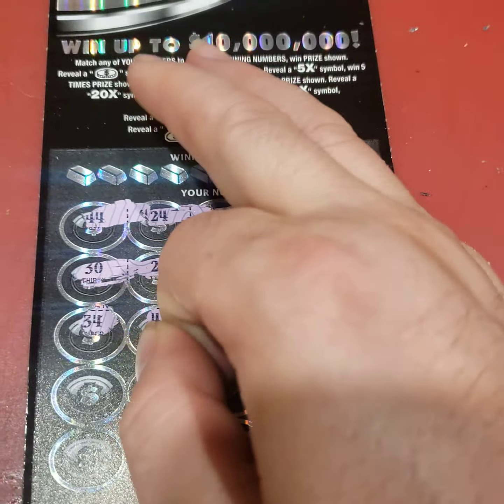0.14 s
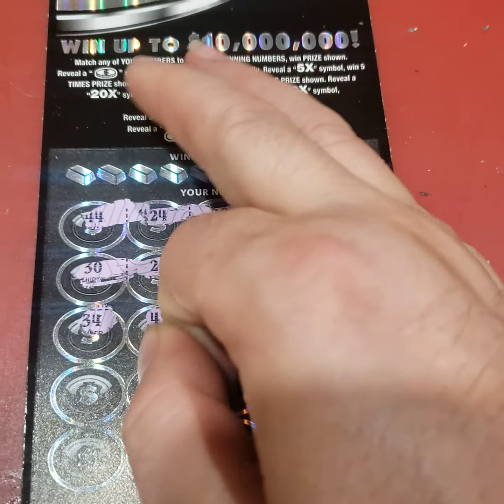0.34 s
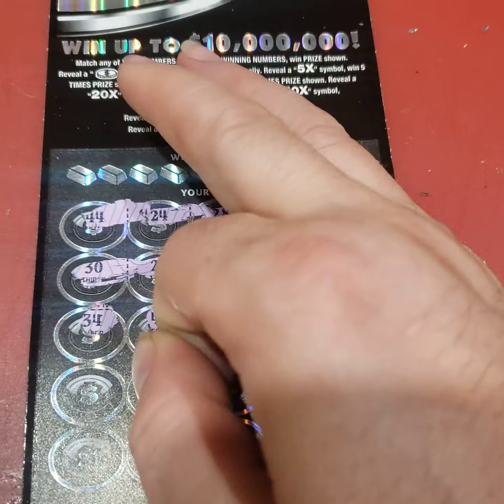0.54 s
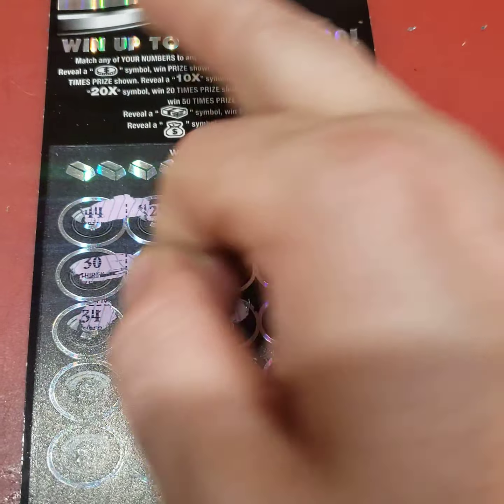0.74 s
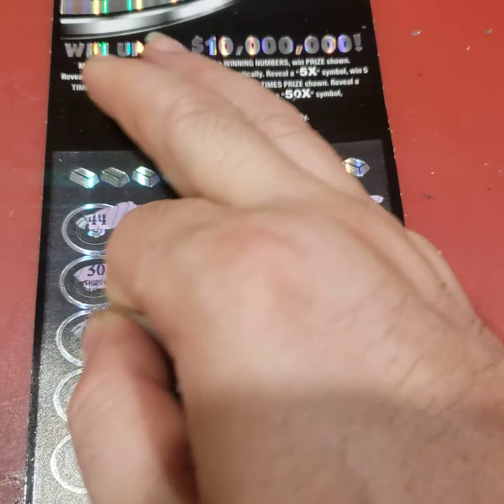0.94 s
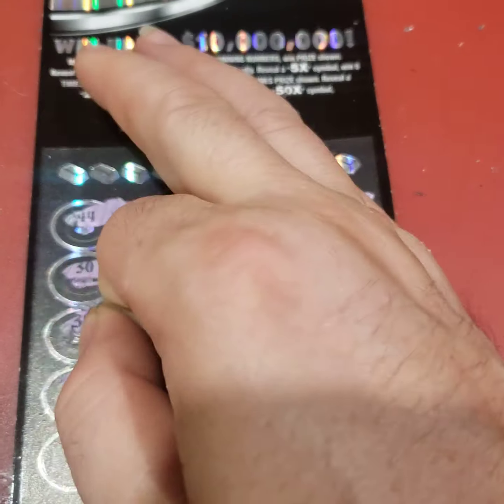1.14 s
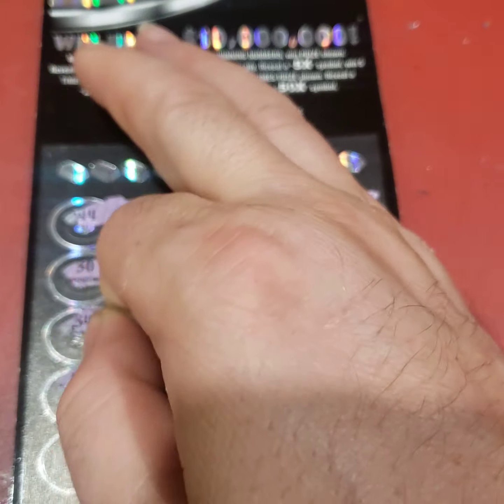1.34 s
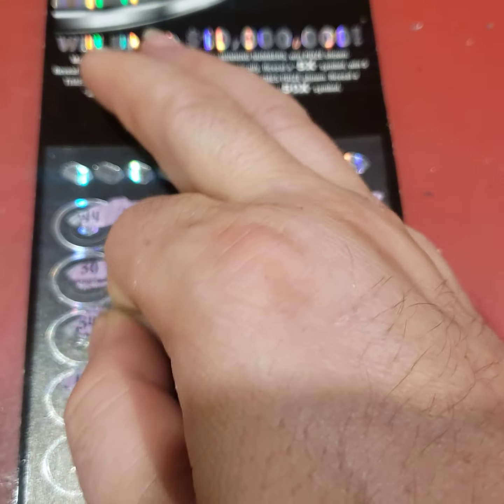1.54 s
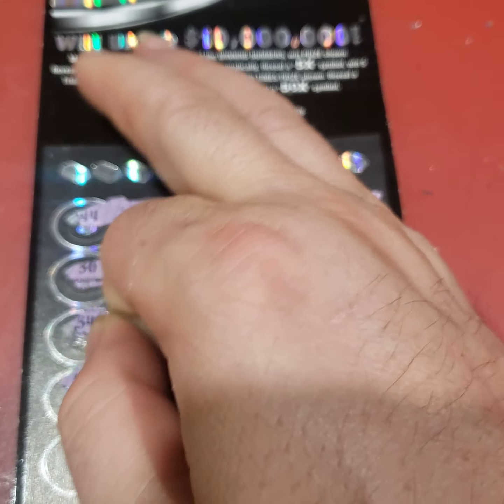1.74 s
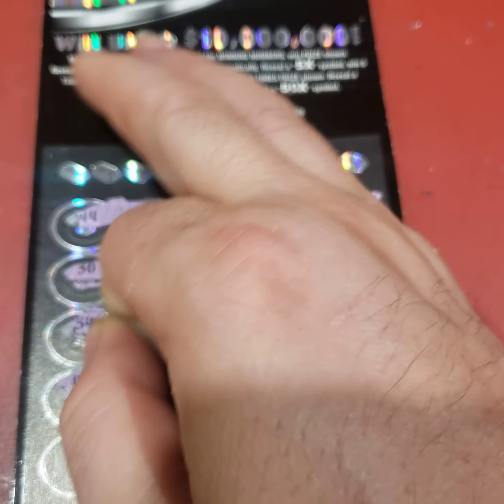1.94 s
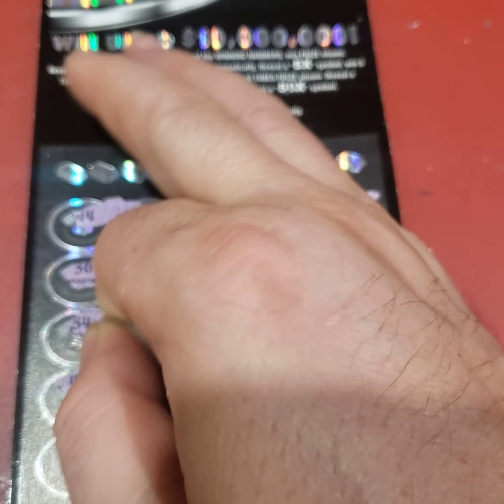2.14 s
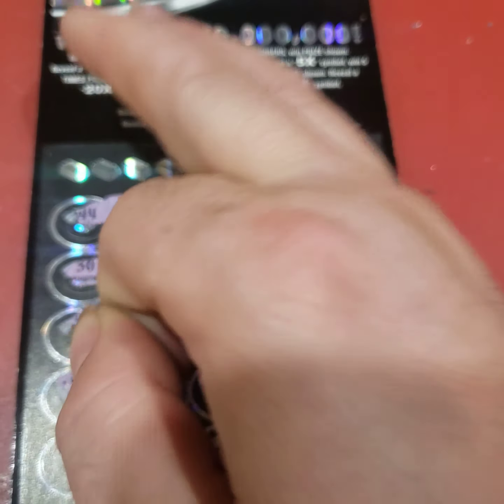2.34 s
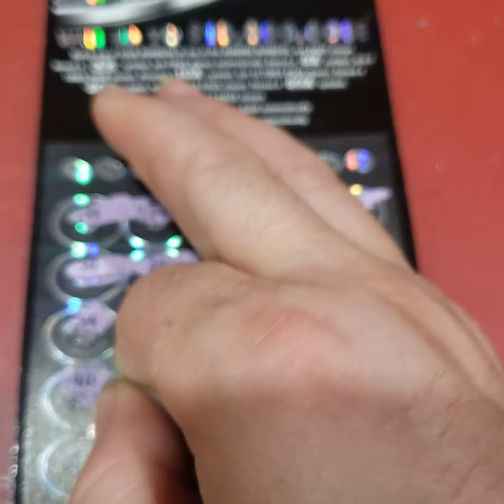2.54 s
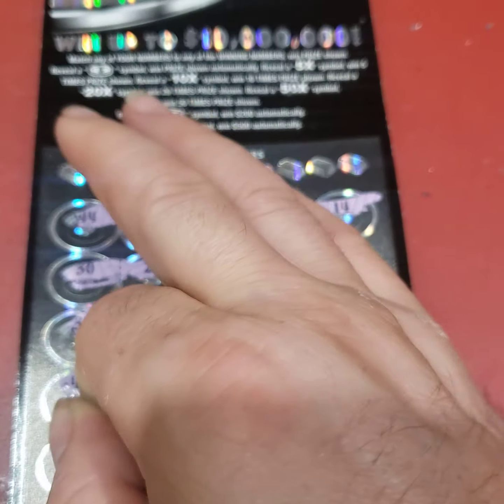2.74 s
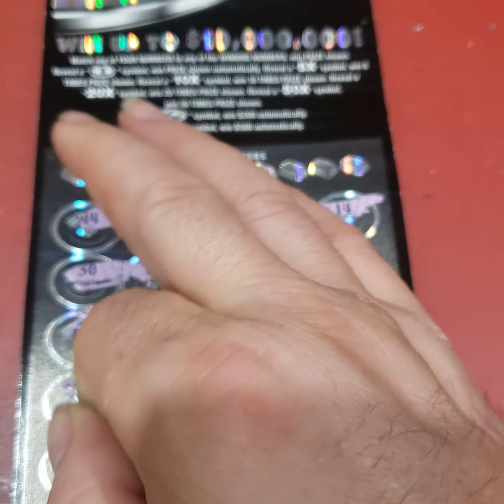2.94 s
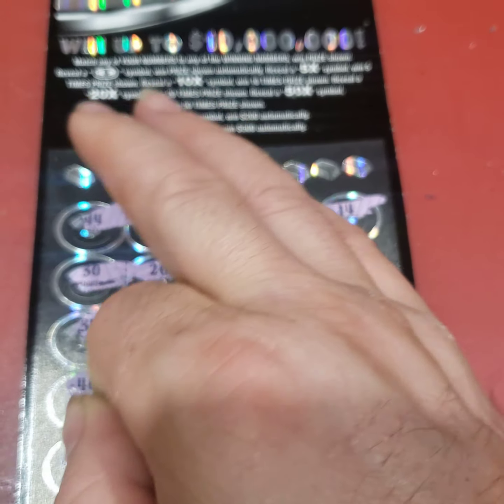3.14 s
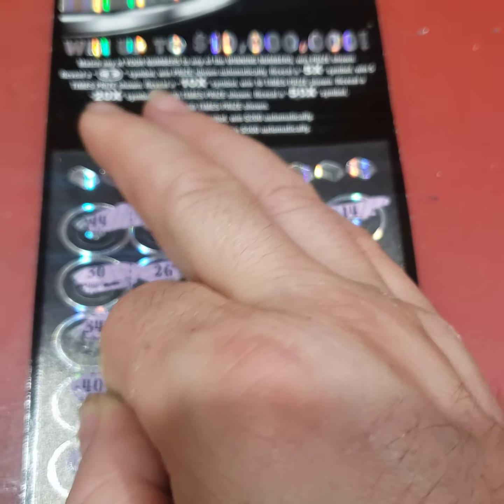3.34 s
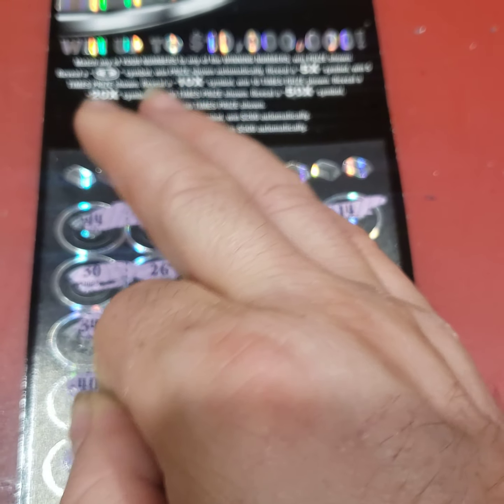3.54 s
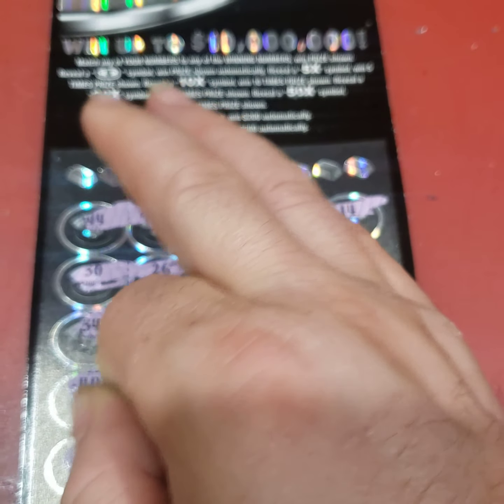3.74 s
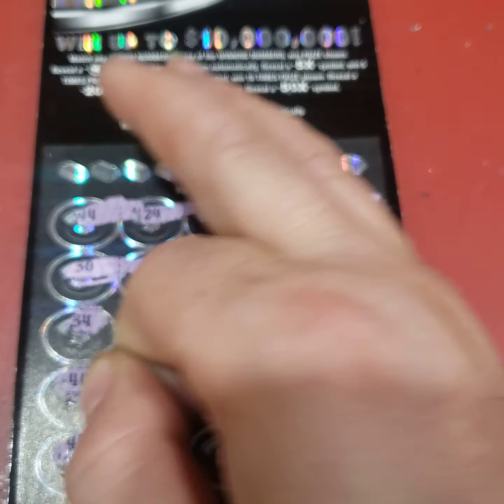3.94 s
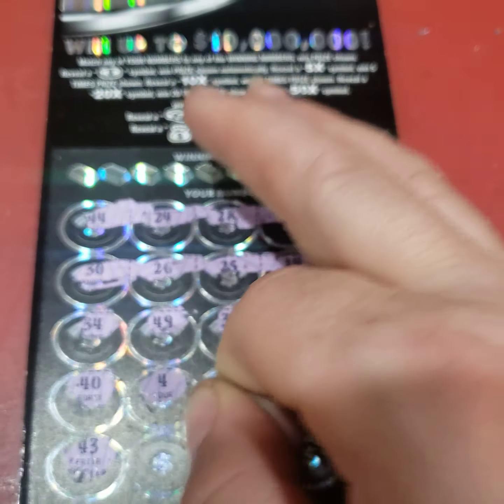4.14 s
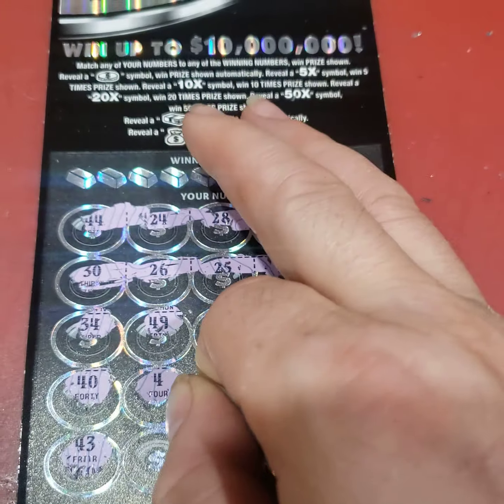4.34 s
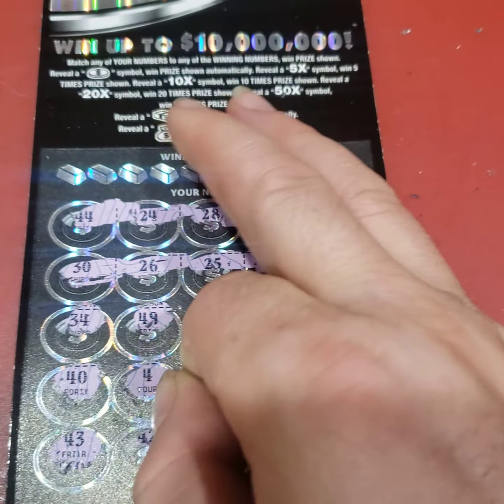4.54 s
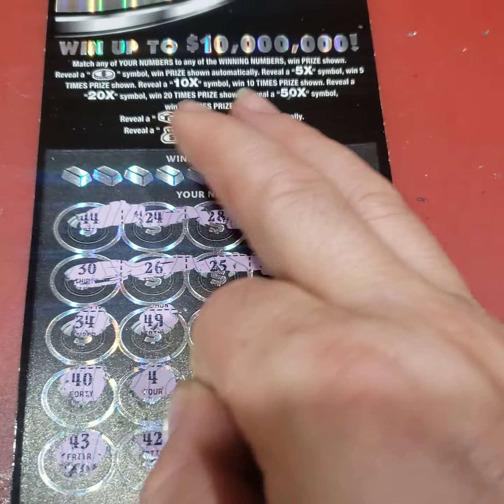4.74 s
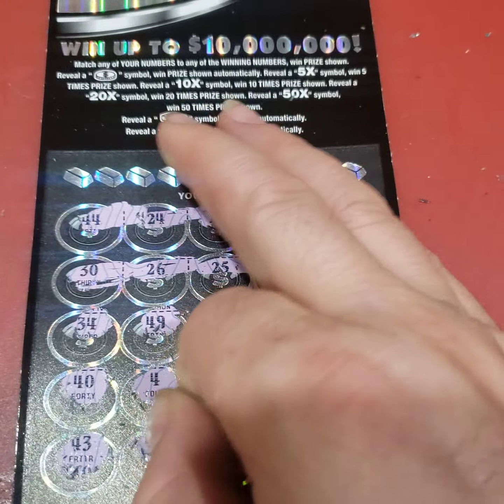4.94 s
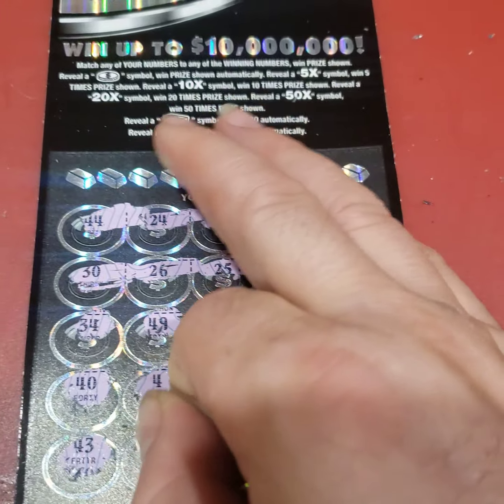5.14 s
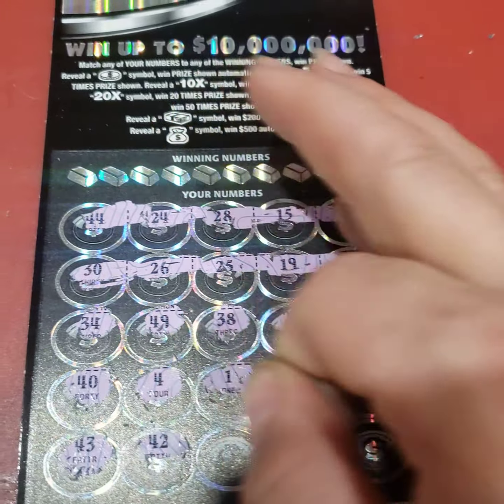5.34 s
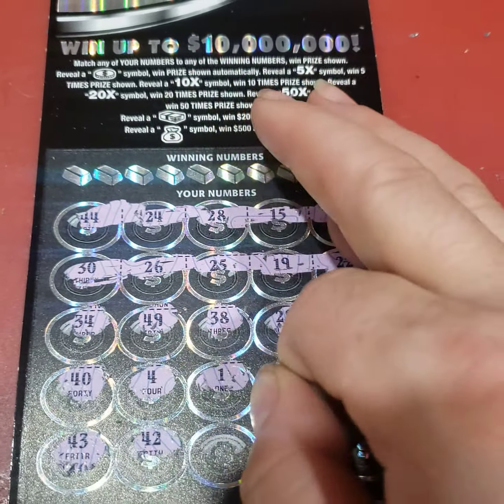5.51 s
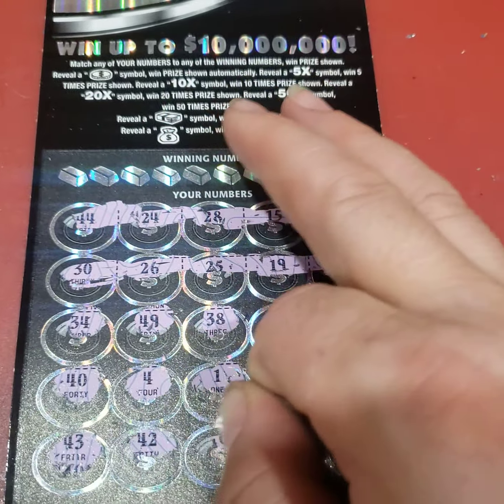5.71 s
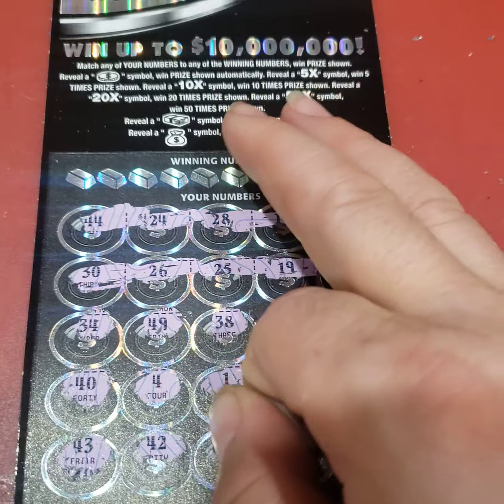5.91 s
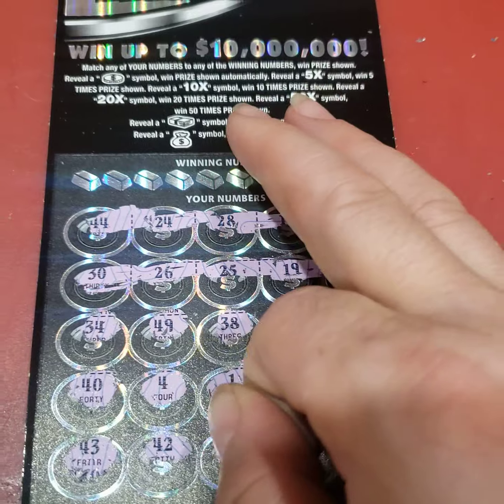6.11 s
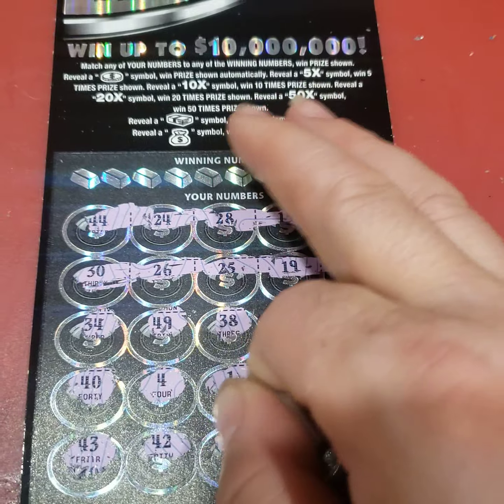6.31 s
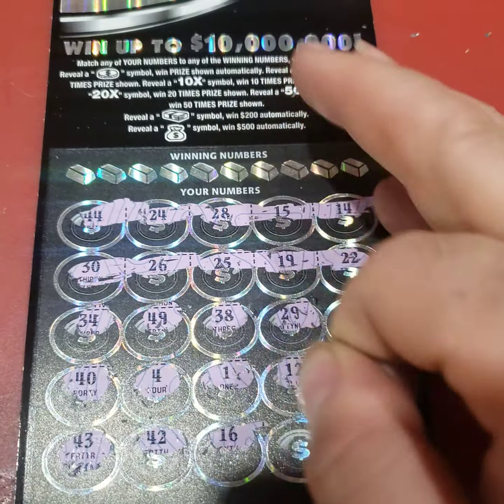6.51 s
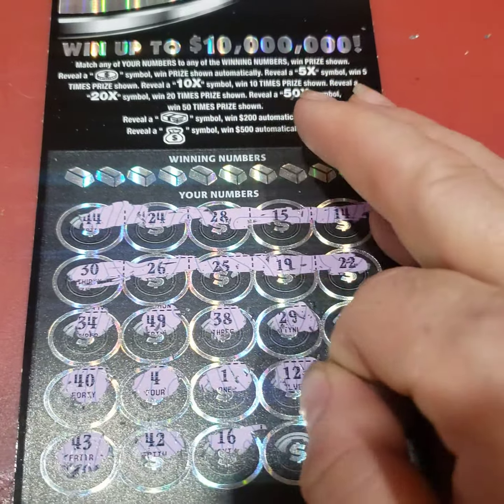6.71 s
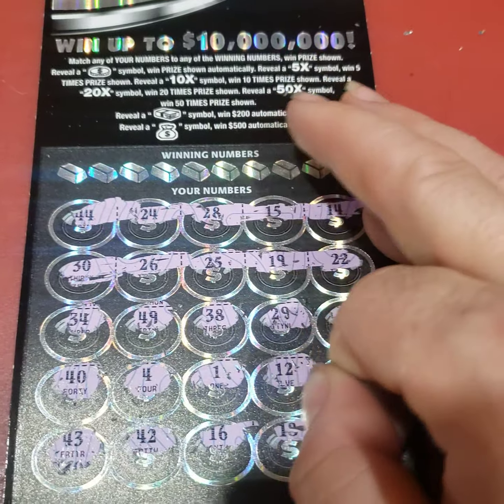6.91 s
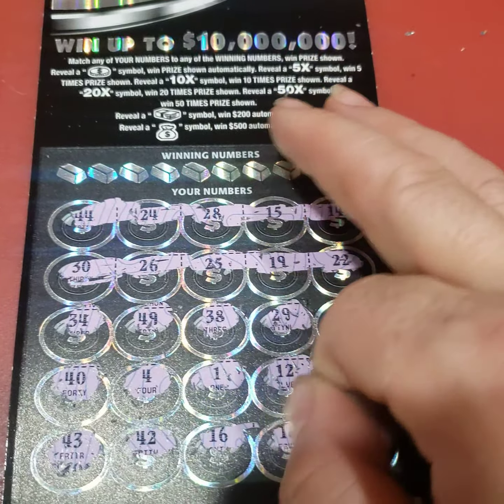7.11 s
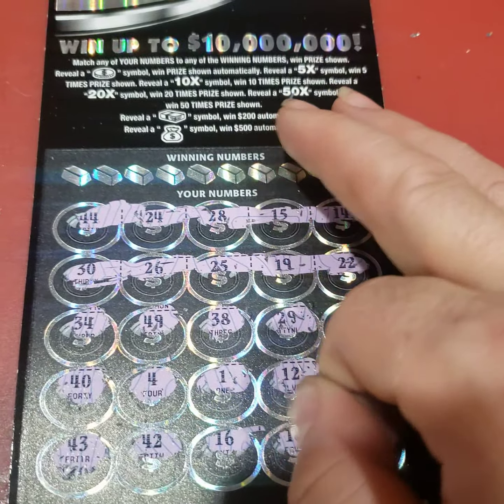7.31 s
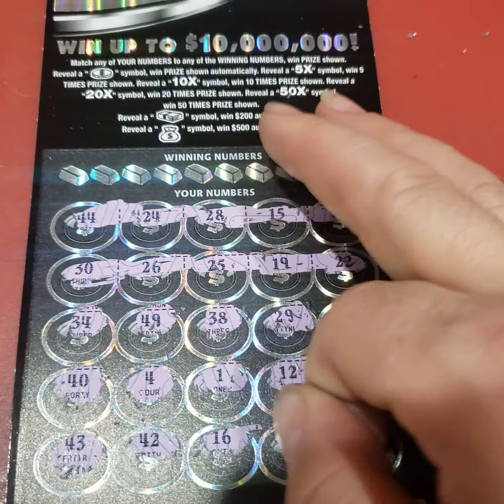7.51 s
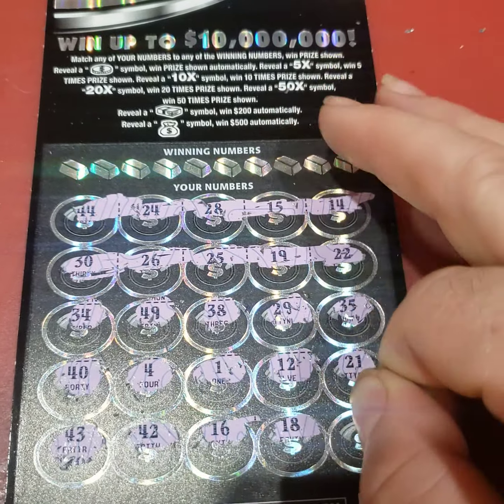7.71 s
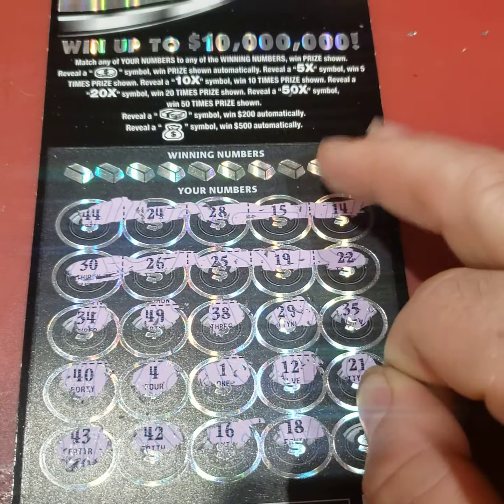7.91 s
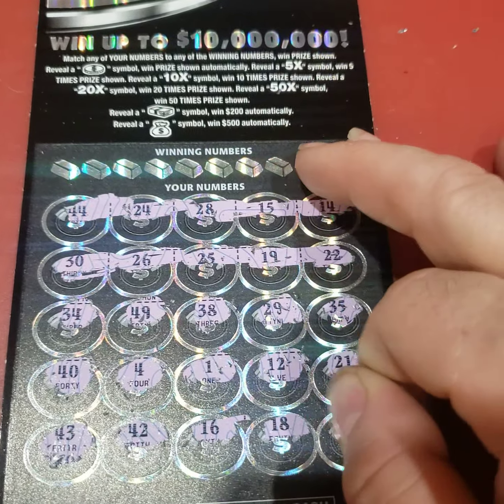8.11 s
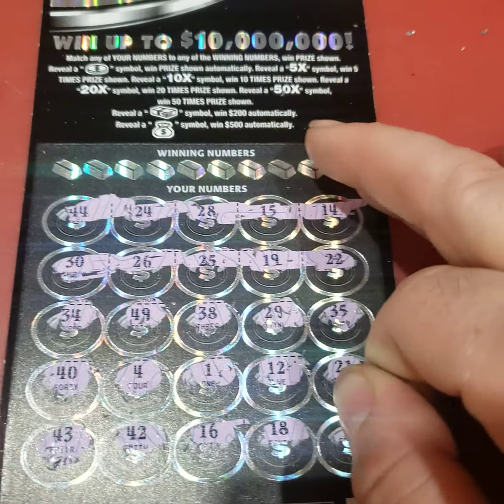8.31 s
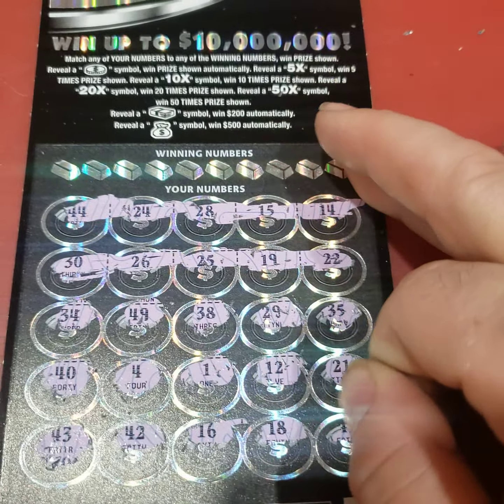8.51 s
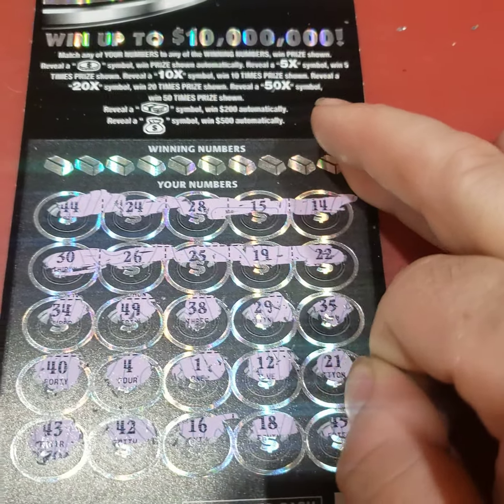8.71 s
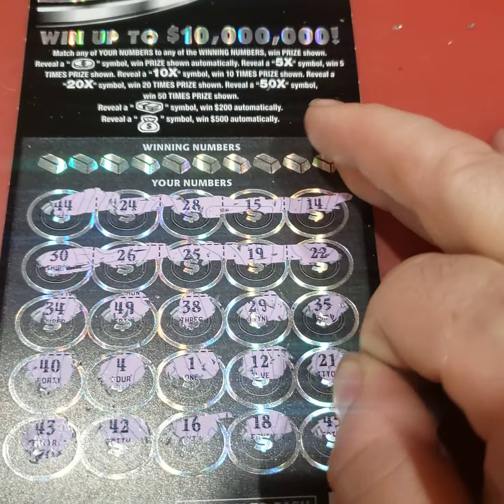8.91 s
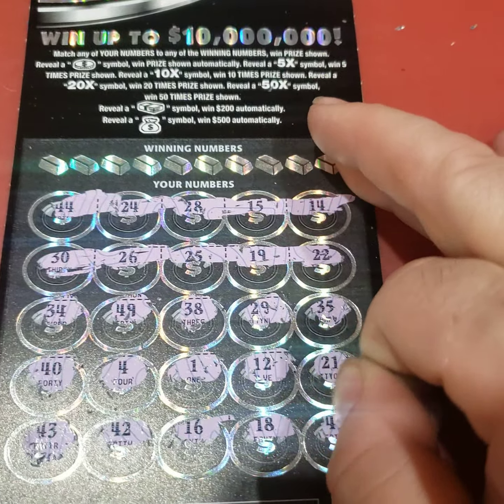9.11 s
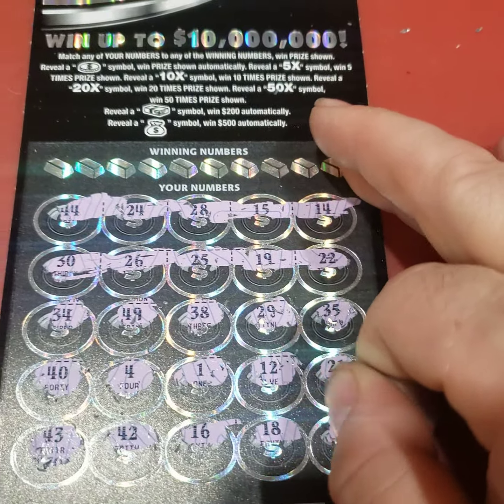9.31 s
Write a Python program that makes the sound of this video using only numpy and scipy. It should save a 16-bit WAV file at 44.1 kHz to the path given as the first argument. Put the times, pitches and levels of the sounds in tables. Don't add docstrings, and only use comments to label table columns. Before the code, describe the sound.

Close, dry, gritty scratching of a coin on a coated card comes in rapid bursts, with small knocks and quiet gaps between.

```python
import sys
import numpy as np
from scipy import signal
from scipy.fft import rfft, irfft
from scipy.io import wavfile
from scipy.ndimage import uniform_filter1d

SR = 44100
rng = np.random.default_rng(int(sys.argv[2]) if len(sys.argv) > 2 else 0)


def file_out(sig):
    cols = np.atleast_2d(sig).T
    lim = np.clip(cols, -1, 1)
    pcm = np.round(lim * 32767).astype(np.int16)
    wavfile.write(sys.argv[1], SR, pcm)


def nominal_scale(level):
    x = np.asarray(level, float) / 20
    return 10 ** x


N = 412758


def rms_one(x):
    return x / np.sqrt(np.mean(x ** 2) + 1e-20)


def at_hz(points, hz):
    points = np.array(points)
    return np.interp(np.log(np.maximum(hz, 1)), np.log(points[:, 0]), points[:, 1])


def drift(rate):
    r = np.exp(-32 * np.pi * rate / SR)
    noise = rng.standard_normal(N // 16 + 2002)
    slow = signal.lfilter([1], [1, -2 * r, r * r], noise)[2000:]
    return np.interp(np.arange(N) / 16, np.arange(len(slow)), rms_one(slow))


def grains(per_s, size_db):
    sizes = nominal_scale(size_db * np.minimum(rng.exponential(1, N), 4)) * rng.choice([-1, 1], N)
    return rms_one(sizes * (rng.random(N) < per_s / SR))


def band(x, low_hz, high_hz):
    return signal.sosfilt(signal.butter(2, [low_hz, high_hz], "band", fs=SR, output="sos"), x)


def bell(x, hz, width, gain_db):
    w, a = 2 * np.pi * hz / SR, nominal_scale(gain_db / 2)
    k = np.sin(w) * width / hz / 2
    return signal.lfilter([1 + k * a, -2 * np.cos(w), 1 - k * a], [1 + k / a, -2 * np.cos(w), 1 - k / a], x)


def body(force, modes, gains):
    out, power = np.zeros((2, N)), 0
    for k, (hz, width, left_db, right_db, lag) in enumerate(modes):
        r, w = np.exp(-np.pi * width / SR), 2 * np.pi * hz / SR
        drive = (-1) ** k * (1 - r) * gains[k] * force + 1e-18
        for side, (level_db, phase) in enumerate([(left_db, w), (right_db, w - lag)]):
            taps = [0, np.sin(phase), r * np.sin(w - phase)]
            out[side] += nominal_scale(level_db) * signal.lfilter(taps, [1, -2 * r * np.cos(w), r * r], drive)
        power += nominal_scale(2 * left_db) * (1 - r) / 4
    return out / np.sqrt(power)


def wander(modes, spread_db, rate):
    return [nominal_scale(spread_db * drift(rate)) for _ in modes]


# (start t/s, coating grit level/dB, coin ring level/dB, hollow under fingers level/dB, opening to port level/dB)
BOUTS = [(0, -12, -0.5, 2.5, 1.5), (.969, -15, 0.5, 4.5, 6.5), (1.849, -18, -1, 6, 9),
         (2.716, -11.5, -1.5, 1.5, 0), (3.9, -26, 0, -2, 5), (4.426, -9.5, -1.5, -8, -1),
         (5.623, -6, 2, 8, -4.5), (6.766, -11, 9, 8, -1), (7.7, -17, -5, 3, 5), (8.057, -18.5, 10.5, 9, 1),
         (8.807, -16.5, 9, 6, 0.5)]
GRIT, COIN_RING, HOLLOW, OPENING = 1, 2, 3, 4


def bout_at(s):
    bouts = np.array(BOUTS)
    number = np.maximum(np.searchsorted(bouts[:, 0] - .02, s) - 1, 0)
    rows = bouts[number]
    return rows.T, s - rows[:, 0]


SETTLE_S = 0.98


def shade(palm_db, axis=None, share=1, mean_db=0):
    bout, since = bout_at(np.arange(N) / SR)
    level_db = np.interp(since, [0, SETTLE_S], palm_db)
    if axis:
        level_db = level_db + share * (bout[axis] - mean_db)
    return nominal_scale(uniform_filter1d(level_db, size=2000))


# (start t/s, length t/s, table
# level/dB, skim level/dB, extra tearing level/dB)
STROKES = [(0.0, 0.015, -34.5, -6.5, 2), (0.017, 0.086, -38.5, 0.5, 0), (0.137, 0.06, -36, -3, -2.5),
           (0.25, 0.041, -41, -3.5, -3), (0.295, 0.028, -35.5, -5, 0.5), (0.355, 0.07, -35, -8, -0.5),
           (0.464, 0.053, -47, 4.5, -1.5), (0.542, 0.068, -35.5, -6.5, 0.5),
           (0.967, 0.11, -34, -6, -0.5), (1.124, 0.081, -39.5, 1, -0.5),
           (1.234, 0.071, -34.5, -5.5, 1), (1.322, 0.095, -39.5, -0.5, 3),
           (1.443, 0.069, -36.5, -7.5, -0.5), (1.535, 0.068, -40.5, 2.5, -2),
           (1.653, 0.08, -35.5, -5, -5), (1.846, 0.087, -37, -11, 0.5), (1.957, 0.033, -41, 0, -1),
           (2.078, 0.063, -36, -7.5, 3), (2.167, 0.051, -42.5, -2.5, 0), (2.253, 0.065, -38.5, -6, 0),
           (2.718, 0.077, -30, -11, 2), (2.832, 0.081, -34.5, -5, 0.5),
                  (2.939, 0.082, -37.5, -5, -0.5), (3.031, 0.11, -37, -3.5, 4.5),
                  (3.159, 0.08, -37, -9.5, 3), (3.259, 0.05, -38.5, -1.5, 2),
                  (3.308, 0.038, -36.5, -3.5, 1.5), (3.371, 0.092, -32.5, -7.5, 1.5),
                  (3.48, 0.061, -39.5, -2, 2.5), (3.577, 0.093, -36.5, -10, 0.5),
                  (3.683, 0.11, -44, -12, 1), (3.788, 0.08, -33, -12, -1.5),
                  (4.426, 0.077, -33.5, -7, -1.5), (4.537, 0.086, -36.5, -7, 1),
                  (4.66, 0.065, -32.5, -8.5, 0.5), (4.743, 0.087, -35.5, -3.5, 2.5),
                  (4.868, 0.09, -36, -11, 1.5), (4.982, 0.084, -42, -8, -1), (5.111, 0.11, -35.5, -12, 1.5),
           (5.626, 0.1, -30, -9, -1.5), (5.756, 0.081, -35.5, -6.5, 0),
                 (5.888, 0.074, -36, -5.5, -0.5), (5.987, 0.04, -37.5, -3.5, 0.5),
                 (6.025, 0.062, -37, -5.5, 0.5), (6.087, 0.11, -36.5, -7, -0.5),
                 (6.207, 0.092, -43.5, -4.5, 3.5), (6.323, 0.1, -34.5, -10.5, -2),
                 (6.764, 0.093, -28, -11.5, -1), (6.91, 0.078, -36, -2.5, 0),
                 (7.042, 0.043, -33.5, -2.5, -0.5), (7.093, 0.024, -32.5, -6, -4),
                 (7.143, 0.072, -38, -0.5, 1.5), (7.262, 0.067, -34.5, -10.5, -1),
                 (7.38, 0.054, -40.5, -2, -2), (7.471, 0.1, -32, -12.5, -1.5),
                 (8.056, 0.072, -31, -10, 3.5), (8.179, 0.069, -35, -2.5, 2),
                 (8.295, 0.053, -40.5, -1, 2.5), (8.425, 0.061, -37.5, -4.5, -2),
                 (8.542, 0.069, -38, -2.5, 0.5), (8.806, 0.071, -30.5, -11.5, -1.5),
                 (9.04, 0.059, -35, -3.5, 0), (9.273, 0.065, -33, -5.5, 1)]
# (start t/s, length t/s, table level/dB, rasp over table level/dB)
SHIFTS = [(0.689, 0.021, -49.5, -12), (2.339, 0.062, -52, -22), (2.656, 0.057, -40, -36),
          (3.922, 0.035, -46.5, -40), (3.981, 0.11, -55, -22), (4.205, 0.038, -57, -14),
          (4.332, 0.027, -45.5, -25), (5.232, 0.036, -49.5, -22), (5.312, 0.057, -52, -10.5),
          (5.362, 0.061, -55, -17), (5.429, 0.14, -54, -23), (6.479, 0.039, -57.5, -3.5),
          (6.652, 0.024, -49.5, -30), (6.708, 0.037, -51, -27), (7.615, 0.031, -46.5, -16),
          (7.759, 0.03, -39.5, -23), (8.693, 0.082, -47, -42), (8.914, 0.1, -44, -43),
          (9.153, 0.089, -45, -46)]
PEAK_SHARE, PEAK_LATER_PER_DB = 0.76, 0.07
FIRST_PEAK_SHARE, SHIFT_PEAK_SHARE = 0.78, 0.45
RASP_PER_SKIM = 1.16
SHIFT_CARD_DB, SHIFT_CARD_PER_RASP = -4, 0.24


def strokes():
    start, length, table_db, skim, tearing_db = np.transpose(STROKES)
    bout, since = bout_at(start)
    first = since < .02
    share = np.where(first, FIRST_PEAK_SHARE, PEAK_SHARE + PEAK_LATER_PER_DB * skim)
    rasp_db = bout[GRIT] + RASP_PER_SKIM * skim + tearing_db
    scrapes = [start, length, share, table_db, skim, rasp_db]
    start, length, table_db, rasp_db = np.transpose(SHIFTS)
    share = SHIFT_PEAK_SHARE + 0 * start
    card_db = SHIFT_CARD_DB + SHIFT_CARD_PER_RASP * rasp_db
    shifts = [start, length, share, table_db, card_db, rasp_db]
    rows = np.hstack([scrapes, shifts]).T
    rows[:, 2] = np.clip(rows[:, 2], .1, .95)
    return rows


def stroke_shape(levels_db, rise, fall, spill, mid=0, follows=1):
    out, t = np.zeros(N), np.arange(N) / SR
    for (start, length, share, *_), level_db in zip(strokes(), levels_db):
        share = np.clip(mid + follows * (share - mid), .05, 1)
        top, end = start + share * length, start + (1 + spill) * length
        span = slice(int(start * SR), int(end * SR))
        turn = np.interp(t[span], [start, top, end], [0, np.pi / 2, np.pi])
        power = np.where(turn < np.pi / 2, rise, fall)
        out[span] += nominal_scale(level_db) * np.abs(np.sin(turn)) ** power
    return out


def blows(events, level_db):
    out, rows = np.zeros(N), np.array(events)
    out[(rows[:, 0] * SR).astype(int)] = nominal_scale(rows[:, 1] + level_db)
    return out


# (f/Hz, level per Hz/dB)
FLOOR = [(15, -44), (25, 0), (102, -7), (212, 2.5), (476, -4.5), (887, -25), (1650, -35), (2480, -37.5),
         (2760, -34.5), (3080, -36.5), (8360, -45.5), (9570, -43), (10700, -42), (14800, -30), (16000, -27)]
# (f/Hz, likeness [-1 to 1])
FLOOR_LIKENESS = [(60, 0.41), (180, 1), (550, 0.16), (1650, 0.036), (4970, -0.039), (15000, 0.048)]
# (f/Hz, left over right level/dB)
FLOOR_BALANCE = [(60, 0), (300, -3.5), (700, -1), (2500, 8), (5000, 4), (8000, 15), (10000, 9.5),
                 (12000, 5), (15000, 11)]
FLOOR_DB, HUM_DB, MAINS_HZ = -54.5, -65.5, 60


def room_floor():
    hz = np.arange(N // 2 + 1) * SR / N
    mid, side = rfft(rng.standard_normal((2, N)))
    alike = np.clip(at_hz(FLOOR_LIKENESS, hz), -.9, .99)
    lean = at_hz(FLOOR_BALANCE, hz) / 2
    left = (np.sqrt(1 + alike) * mid + np.sqrt(1 - alike) * side) * nominal_scale(lean)
    right = (np.sqrt(1 + alike) * mid - np.sqrt(1 - alike) * side) * nominal_scale(-lean)
    noise = rms_one(irfft(nominal_scale(at_hz(FLOOR, hz)) * [left, right], N))
    hum = nominal_scale(HUM_DB) * np.sin(2 * np.pi * MAINS_HZ * np.arange(N) / SR)
    return nominal_scale(FLOOR_DB + 2.1 * drift(12.0)) * noise + hum


def room(x, t60):
    t = np.arange(SR // 2) / SR
    tail = rng.standard_normal((2, SR // 2)) * nominal_scale(-60 * t / t60) * np.clip((t - .004) / 0.0031, 0, 1)
    return signal.fftconvolve(x, tail / np.sqrt(np.sum(tail ** 2) / 2), axes=1)[:, :N]


# (from t/s, to t/s, f/Hz, width f/Hz, level/dB)
POSES = [(0, .66, 2270, 400, -1), (.95, 1.8, 3500, 500, -8), (.95, 1.8, 2750, 600, 6),
         (1.82, 2.35, 3320, 500, -9), (2.697, 3.38, 3230, 600, -11), (2.706, 3.38, 2260, 700, 5.5),
         (3.56, 3.9, 2600, 600, -5), (4.41, 5.3, 2500, 500, -3), (4.41, 5.3, 1650, 300, 3.5),
         (5.6, 6.1, 8100, 2000, -3), (5.6, 6.0, 3400, 500, -3), (6.75, 7.65, 2820, 600, -5),
         (6.748, 7.657, 1680, 500, -4), (8.046, 8.657, 1520, 450, 5.5), (8.042, 8.3, 2260, 300, -10),
         (8.04, 9.36, 4900, 600, -3), (6.75, 7.65, 5000, 600, -2), (8.17, 8.28, 2950, 500, 4),
         (6.03, 6.2, 2800, 900, 3), (5.6, 6.45, 1800, 500, -3), (1.32, 1.45, 4600, 1200, 3),
         (2.64, 2.73, 1600, 900, -7), (5.6, 5.7, 600, 300, 3), (8.8, 9.36, 750, 300, -3),
         (1.3, 1.45, 750, 300, -3), (3.57, 3.9, 400, 150, -3), (4.85, 5.1, 400, 150, -3),
         (.45, .7, 400, 150, -3), (6.55, 6.82, 280, 100, 4), (1.45, 1.8, 5500, 2000, -3)]
POSE_FADE_S = .03


def cupped_hand(x):
    out = x.copy()
    for start, end, *pose in POSES:
        span = slice(int(start * SR), min(int(end * SR), N))
        t = np.arange(span.stop - span.start) / SR
        fade = np.clip(np.minimum(t, t[::-1]) / POSE_FADE_S, 0, 1)
        out[:, span] += fade * (bell(out[:, span], *pose) - out[:, span])
    return out


# (start t/s, length t/s, level/dB)
BRUSHES = [
    (0.038, 0.1, -58.5),
    (3.397, .11, -58),
    (5.302, 0.11, -69),
    (5.42, 0.15, -78),
    (6.024, 0.15, -56.5),
    (8.188, 0.063, -63),
]
BRUSH_HZ = (2180, 3900)


def brushes():
    t = np.arange(N) / SR
    swell = 0
    for s, length, level_db in BRUSHES:
        swell = swell + nominal_scale(level_db) * np.sin(np.pi * np.clip((t - s) / length, 0, 1))
    return swell * rms_one(band(grains(5000, size_db=1.5), *BRUSH_HZ)) * nominal_scale([[3], [-6]])


# (t/s, f/Hz, level/dB)
REGRIPS = [
    (.697, 3900, -59),
    (.868, 3770, -55),
    (2.386, 3760, -47),
    (2.558, 3460, -44),
    (4.047, 3760, -39.5),
    (4.214, 3530, -46),
]


def regrips():
    out, t = np.zeros(N), np.arange(3000) / SR
    for (s, hz, level_db), shake in zip(REGRIPS, rng.standard_normal((len(REGRIPS), 3000))):
        ring = band(shake * nominal_scale(-60 * t / 0.051), hz - 450, hz + 600)
        out[int(s * SR):int(s * SR) + 3000] += nominal_scale(level_db + 8) * ring
    return out * nominal_scale([[0], [-16]])


# (t/s, peak level/dB, hardness [0
TICKS = [(0.6552, -29.5, 1.94), (0.696, -32.5, 1.47), (0.892, -43.5, 0.7), (0.954, -44, 1),
         (1.68, -39, 2.4), (2.385, -30, 1.6), (2.559, -43, 0.43), (2.594, -44, 1.3), (2.637, -41, 0.95),
         (3.184, -23, 2.2), (3.292, -22.5, 1.5), (3.419, -31, 2), (3.794, -39.5, 1.1), (4, -44.5, 2),
         (4.048, -24.5, 1.97), (4.2128, -43, 0.89), (4.221, -34, 0.61), (4.335, -32.5, 1.36),
         (4.46, -37, 2), (4.6753, -35, 1.9), (5.547, -38, 1.4), (6.2347, -38, 0.9), (6.493, -40.5, 1.4),
         (7.065, -31, 2), (7.486, -34, 0.29), (7.764, -41, 2.2), (7.7793, -26.5, 1.26), (7.9964, -43, 1.7),
         (8.1368, -28, 1.4), (8.347, -23.5, 1.53),
         (0.876, -46, 0.49), (1.985, -55, 1.8), (3.517, -32, 2), (5.4594, -46, 2), (6.02, -46, 0.8),
          (6.433, -47, .8), (6.517, -35.5, 2), (6.622, -51, 1.6), (6.706, -45, 0.85), (9.298, -42, 2),
          (2.71, -49, 1.1), (3.386, -49, 1), (5.0, -46, 0.4), (5.045, -42, .9), (6.221, -44, 0.67),
          (7.59, -44, 1.2), (7.63, -47, 0.99), (8.062, -50, -.3), (8.146, -40, 1.1), (8.439, -49, 1.2)]
TICK_S, TICK_FALL_DB = 0.0042, 10.5


def ticks():
    out, t = np.zeros((3, N + 1200)), np.arange(1200) / SR
    events = TICKS
    for (s, peak_db, hardness), burst in zip(events, rng.standard_normal((len(events), 1200))):
        at = int(s * SR)
        burst = burst * np.exp(-3 * t / TICK_S) * np.minimum(t / 0.00032, 1)
        away = np.abs(np.arange(3)[:, None] - hardness)
        out[:, at:at + 1200] += nominal_scale(peak_db - TICK_FALL_DB * away) * burst
    return out[:, :N]


# (t/s, peak level/dB)
CATCHES = [(0.165, -27), (0.365, -20.5), (0.478, -26), (0.559, -27.5), (0.97, -22), (1.153, -19),
           (1.452, -23), (1.874, -19), (1.971, -27), (2.083, -18), (2.666, -26), (2.958, -18.5),
           (3.178, -15.5), (3.28, -18), (3.385, -19.5), (4.445, -17.5), (4.667, -28), (4.776, -28),
           (4.886, -21), (5.618, -28), (5.895, -22), (5.936, -14.5), (5.996, -33), (6.648, -24.5),
           (7.056, -19.5), (7.177, -24), (7.272, -26), (8.324, -18), (8.556, -21), (9.048, -26),
           (0.018, -26.5), (0.075, -21), (1.012, -23), (1.045, -23), (1.245, -28), (1.493, -27),
           (1.68, -23), (2.737, -25), (2.875, -24), (3.063, -29), (3.507, -19.5), (3.598, -21),
           (3.8, -27.5), (4.555, -28), (5.127, -27.5), (5.672, -18.5), (5.772, -26), (6.282, -26),
           (6.353, -23), (6.716, -29), (6.796, -17.5), (6.96, -19), (7.484, -32), (8.079, -19.5),
           (8.092, -17), (8.215, -21), (8.232, -25), (8.455, -27.5), (8.824, -35), (9.284, -20)]
# (f/Hz, width f/Hz, left level/dB, right level/dB, right lag [rad])
TABLE = [(61, 8.6, -13, -19, 0.08), (90.4, 20.5, -15.5, -11, 0.16), (160, 38.4, -11, -10, 0.34),
         (227.8, 33.4, -4.5, -4, 0), (304, 50.7, -5, -1.5, 0.057), (360.7, 29.8, 1, 5, 0.66),
         (426.5, 38, -2.5, -4, 0.94)]
# (f/Hz, width f/Hz, left level/dB, right level/dB, right lag [rad])
CARD = [(491, 64, -1.5, -1.5, 1.74), (643, 117.5, 3.5, -22, 0.49), (847, 195, -0.5, -4, 0.034),
        (1035, 208, -7, -10, 0.87), (1258, 178, -8.5, -19.5, 0.23), (1650, 259, -12, -10.5, 0.037),
        (1950, 410, -13.5, -16, 0.63), (2114, 520, -19.5, -27.5, 1.03)]
BITE_S, BITE_DB = 0.00801, 1.5
PALM_BASS_DB, PALM_CARD_DB = (-3.5, 5.5), (1.5, -1.5)
GRIT_MEAN_DB, CARD_PER_GRIT = -12.5, 0.28
TOP_CARD_PER_HOLLOW = -0.28
CONTACT_HZ = 2070
RIGHT_LATE = 6


def table_and_card():
    rows = strokes()
    table_db, card_db = rows[:, 3], rows[:, 4]
    slips = grains(600 * nominal_scale(3 * drift(30)), size_db=2.5)
    bites = blows(rows[:, [0, 3]] + [BITE_S, BITE_DB], level_db=12.5)
    knock = blows(CATCHES, level_db=14.0) + bites
    table = stroke_shape(table_db + 1.32, rise=0.38, fall=0.69, spill=0.17) * slips + knock
    card_slips = rms_one(slips + 1.52 * grains(2500, size_db=3.5))
    card = stroke_shape(table_db + card_db + 6, rise=0.66, fall=0.99, spill=0.14) * card_slips
    soft_knock = signal.lfilter([.12], [1, -.88], knock)

    table_gains, card_gains = wander(TABLE, 1.88, rate=5.5), wander(CARD, 1.97, rate=4.3)
    table_gains[:2] = shade(PALM_BASS_DB) * table_gains[:2]
    speed = np.clip(stroke_shape(0 * table_db, rise=0.83, fall=0.37, spill=0.3), .3, 1)
    grip = shade(PALM_CARD_DB, axis=GRIT, share=CARD_PER_GRIT, mean_db=GRIT_MEAN_DB)
    card_gains[3:] = speed * nominal_scale(2.5) * grip * card_gains[3:]
    card_gains[5:] = shade((0, 0), axis=HOLLOW, share=TOP_CARD_PER_HOLLOW) * card_gains[5:]

    both = body(table, TABLE, table_gains) + body(card + nominal_scale(-6) * soft_knock, CARD, card_gains)
    both[1] = np.roll(both[1], RIGHT_LATE)
    return signal.sosfilt(signal.butter(6, CONTACT_HZ, fs=SR, output="sos"), both)


# (f/Hz, width f/Hz, left level/dB, right level/dB, right lag [rad])
RING = [(2610, 960, 1, -13, 2.46), (4080, 770, 2, -46, 9)]
# (f/Hz, width f/Hz, left level/dB, right level/dB, right lag [rad])
EDGE = [(5660, 2700, 2.4, -54, 1.1), (7330, 3400, -2.5, -37, 4.9)]
# (f/Hz, width f/Hz, left level/dB, right level/dB, right lag [rad])
AIR = [(11060, 2200, -1.25, -19, 3), (12540, 1500, 1.5, -15.5, -1.5), (14560, 3000, 0.5, -51, -1)]
PALM_HOLLOW_DB, PALM_RING_DB = (-2, -3.5), (1, -1.5)
RASP_PEAK_SHARE, RASP_FOLLOWS = 0.72, 0.97


def rasp():
    rows = strokes()
    tear = stroke_shape(rows[:, 3] + rows[:, 5] + 2.36, rise=1.8, fall=1.6, spill=0.34,
                        mid=RASP_PEAK_SHARE, follows=RASP_FOLLOWS)
    tear = tear * nominal_scale(2.28 * drift(100))
    coarse = tear * grains(7000 * nominal_scale(3.4 * drift(40)), size_db=3.5)
    fine = tear * grains(12000 * nominal_scale(3.4 * drift(40)), size_db=3.5)
    ring_tick, edge_tick, air_tick = ticks()

    hollow_gain = shade(PALM_HOLLOW_DB, axis=HOLLOW) * nominal_scale(3.5 * drift(22))
    hollow = body(nominal_scale(-10.0) * (coarse + ring_tick), RING[:1], [hollow_gain])
    ring_gain = shade(PALM_RING_DB, axis=COIN_RING) * nominal_scale(2.2 * drift(12.0))
    ring = body(nominal_scale(-5.0) * coarse + ring_tick, RING[1:], [ring_gain])
    edge = body(nominal_scale(0.5) * coarse + edge_tick, EDGE, wander(EDGE, 2.05, rate=2.3))
    air = body(shade((0, 0), axis=OPENING) * fine + air_tick, AIR, wander(AIR, 3.94, rate=17.6))

    path = .6 + .8 * drift(400)
    edge[1], air[1] = path * edge[1], path * air[1]
    low = band(hollow, 2200, 2870) + band(ring, 3250, 4650)
    return low - band(edge, 4700, 10300) + band(air, 8500, 17500)


def scene():
    low = table_and_card()
    high = rasp() + regrips() + brushes()
    spread = high + nominal_scale(-22.0) * high[::-1]
    wet = nominal_scale(-13.0) * room(low, t60=0.41) + nominal_scale(-8.5) * room(spread, t60=0.2)
    return cupped_hand(low + high + wet) + room_floor()


# (f/Hz, width f/Hz, level/dB)
PORT_NOTCH = [
    (3280, 1500, -5),
    (3350, 2200, 2.5),
]
# (f/Hz, width f/Hz, level/dB)
PORT_DIP = [
    (8430, 1100, -4.5),
    (7100, 2200, -7),
]
# (f/Hz, width f/Hz, level/dB)
PORT_PEAK = [
    (14500, 1200, 1.5),
    (10650, 7400, 10),
]


def ports(dry):
    out = []
    for x, notch, dip, peak in zip(dry, PORT_NOTCH, PORT_DIP, PORT_PEAK):
        x = bell(x, *notch)
        x = bell(x, *dip)
        out.append(bell(x, *peak))
    return np.array(out)


TOP_OPENS_DB = -54


def top_spikes(x):
    top = band(band(x, 16000, 16700), 16000, 16700)
    power = uniform_filter1d(top ** 2, size=200).max(axis=0)
    return top * power ** 4 / (power ** 4 + nominal_scale(8 * TOP_OPENS_DB))


def low_pass(x):
    return signal.sosfilt(signal.butter(12, 16680, fs=SR, output="sos"), x)


def record(dry):
    heard = signal.sosfilt(signal.butter(4, 45, "high", fs=SR, output="sos"), ports(dry))
    below_cut = signal.sosfilt(signal.cheby2(16, 50, 15990, fs=SR, output="sos"), heard)
    return low_pass(below_cut + top_spikes(heard))


dry = scene()
out = record(dry)
file_out(out)
```